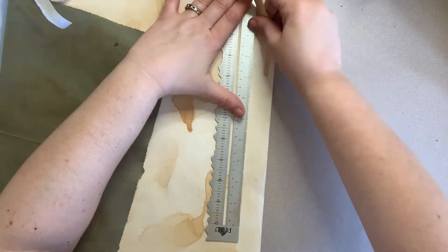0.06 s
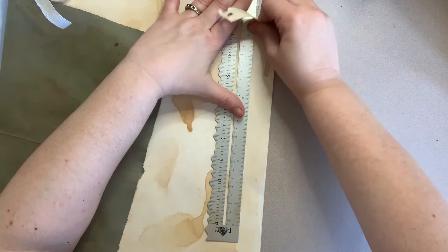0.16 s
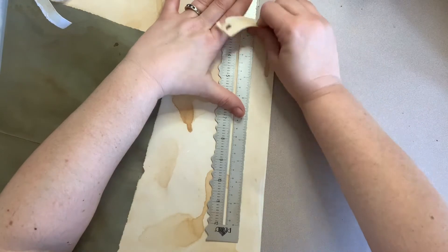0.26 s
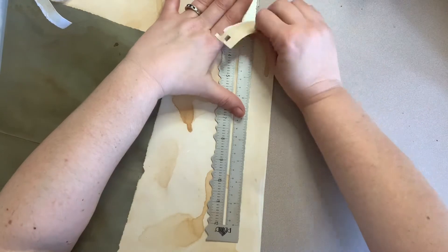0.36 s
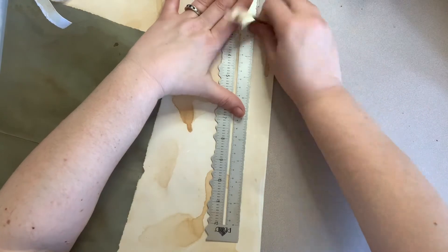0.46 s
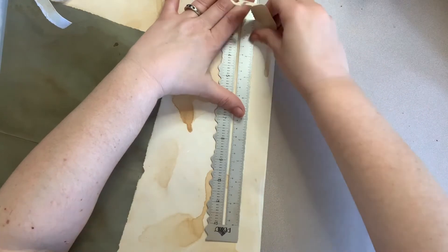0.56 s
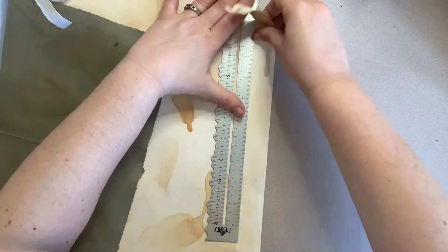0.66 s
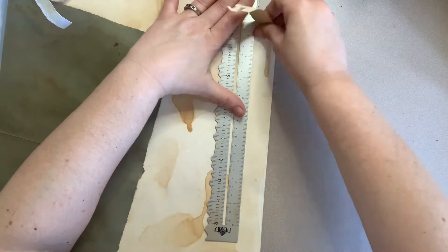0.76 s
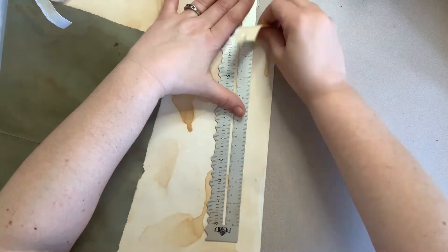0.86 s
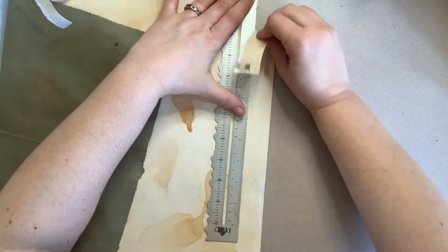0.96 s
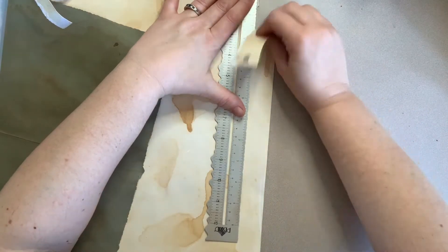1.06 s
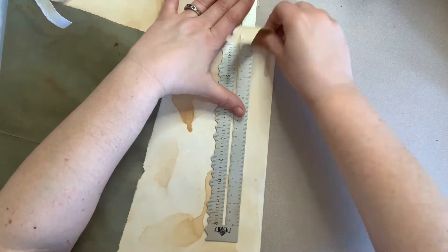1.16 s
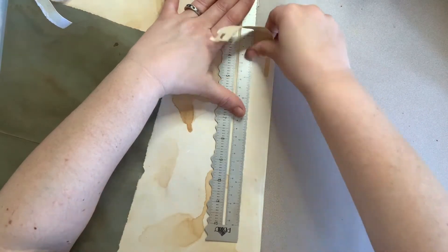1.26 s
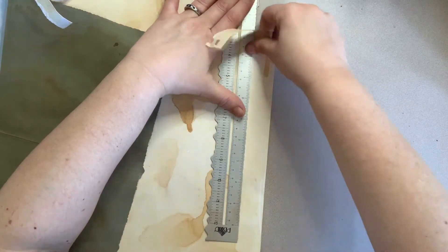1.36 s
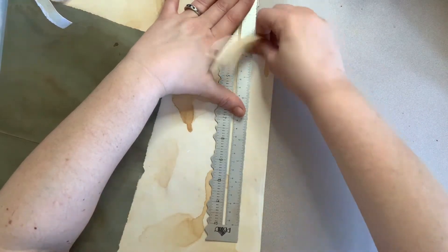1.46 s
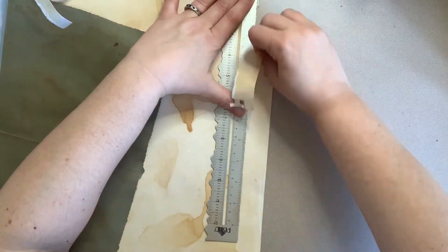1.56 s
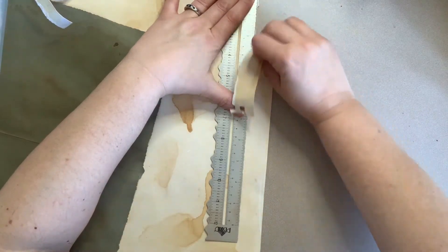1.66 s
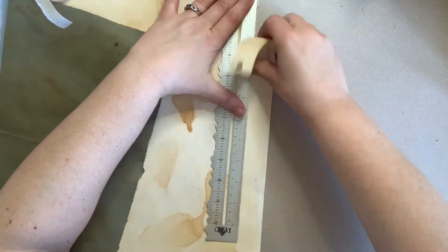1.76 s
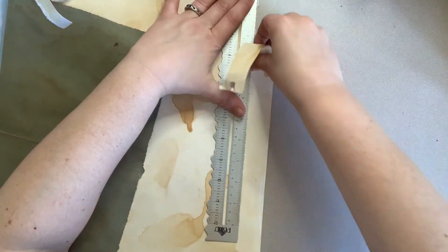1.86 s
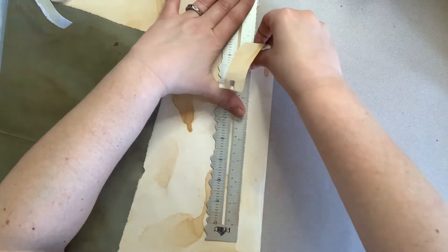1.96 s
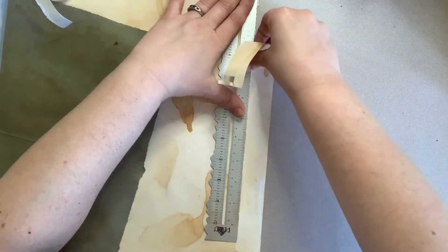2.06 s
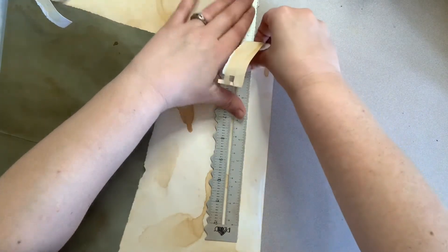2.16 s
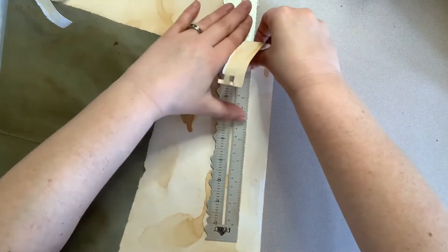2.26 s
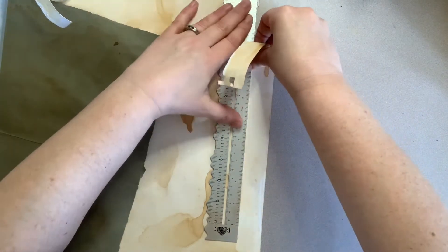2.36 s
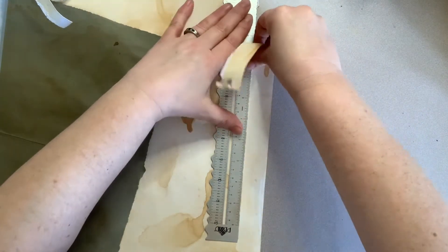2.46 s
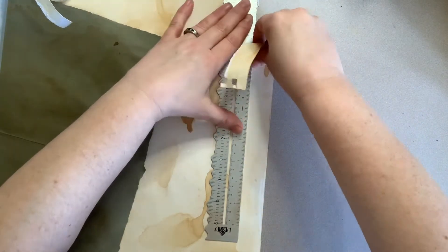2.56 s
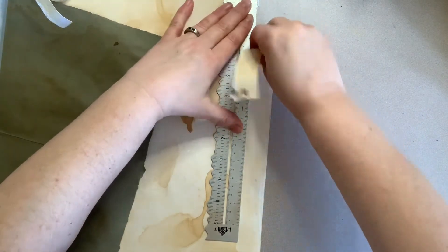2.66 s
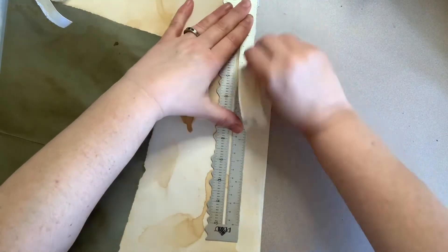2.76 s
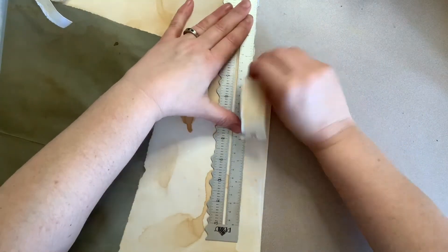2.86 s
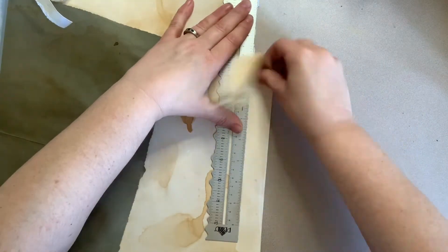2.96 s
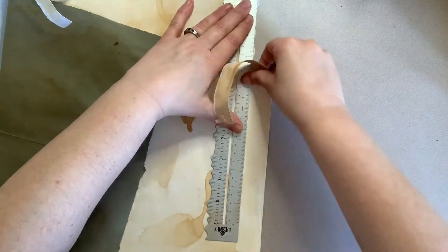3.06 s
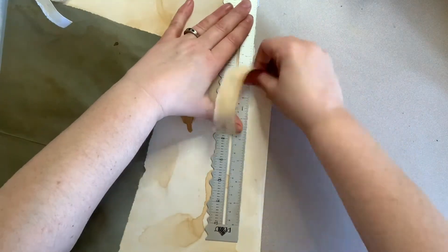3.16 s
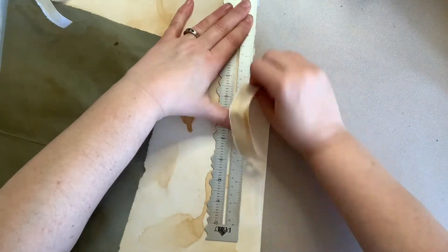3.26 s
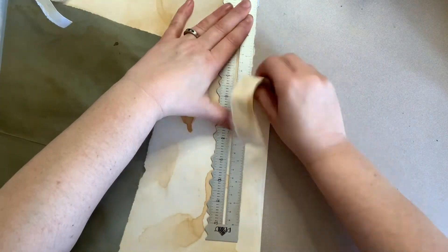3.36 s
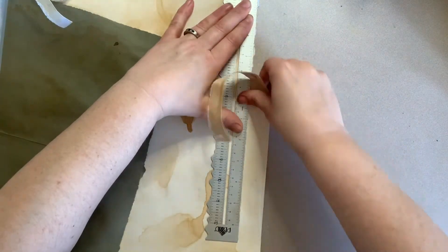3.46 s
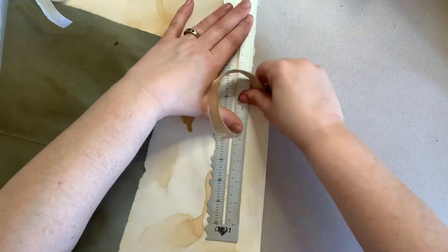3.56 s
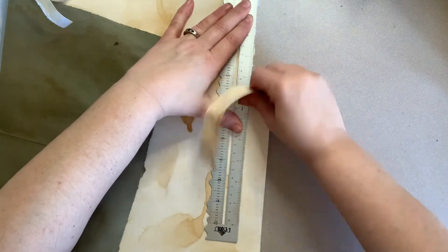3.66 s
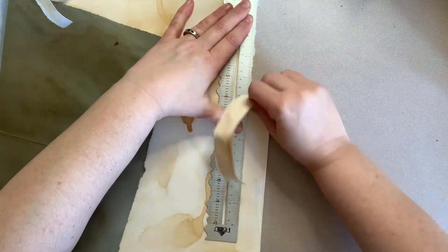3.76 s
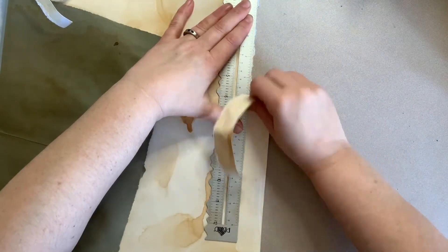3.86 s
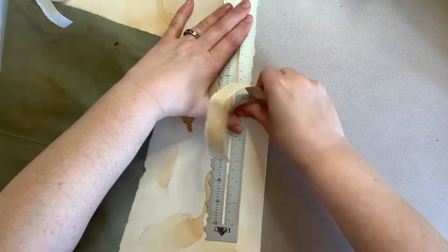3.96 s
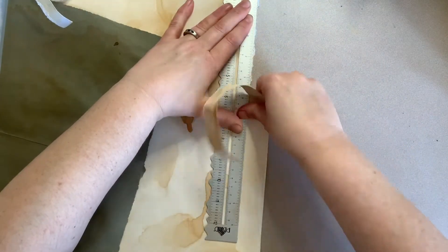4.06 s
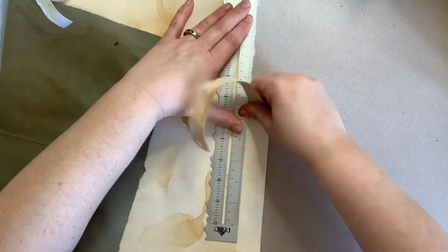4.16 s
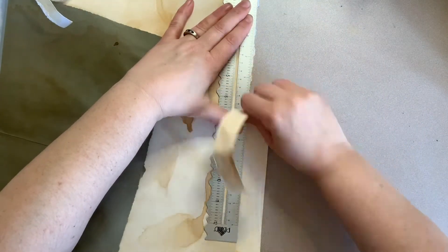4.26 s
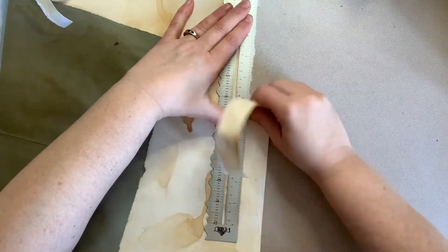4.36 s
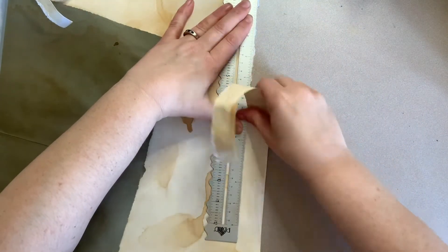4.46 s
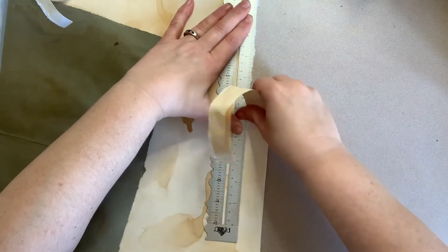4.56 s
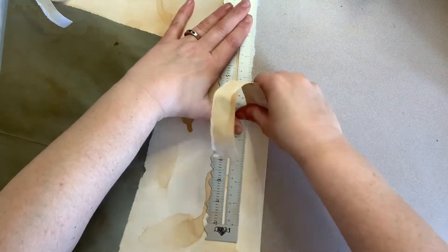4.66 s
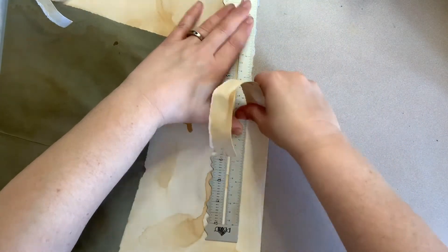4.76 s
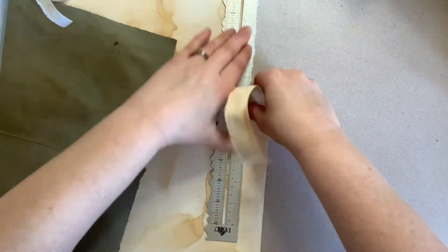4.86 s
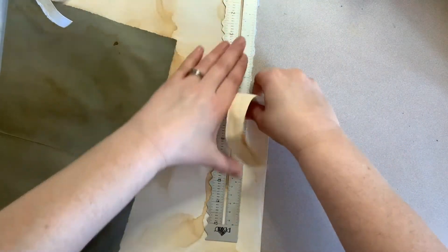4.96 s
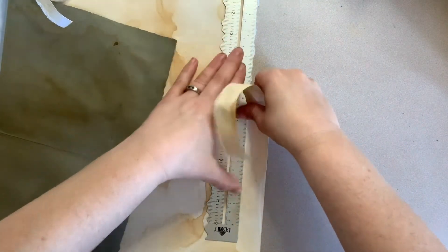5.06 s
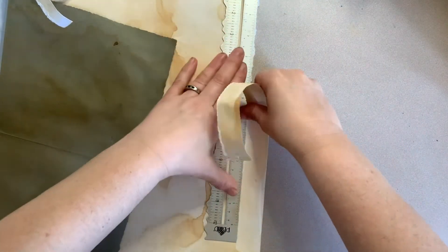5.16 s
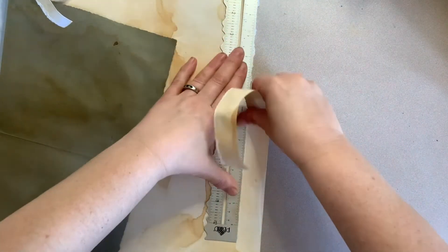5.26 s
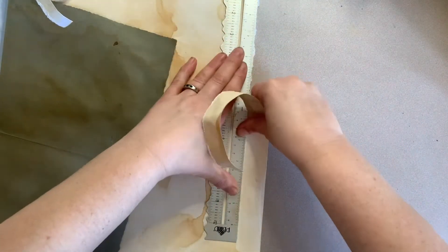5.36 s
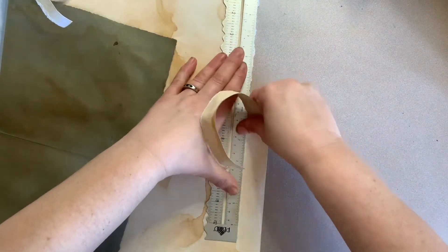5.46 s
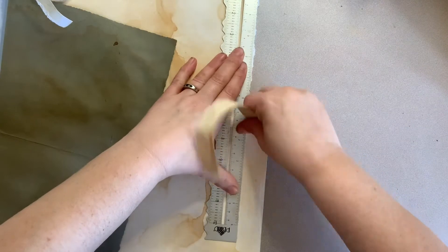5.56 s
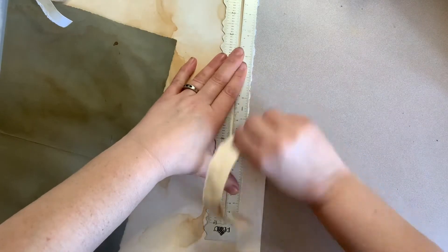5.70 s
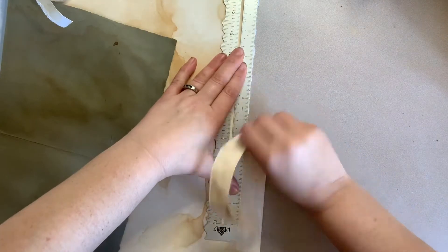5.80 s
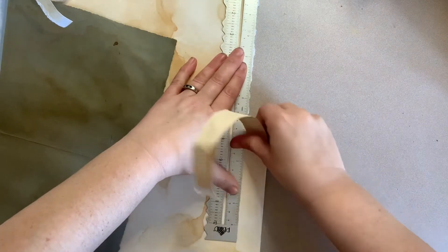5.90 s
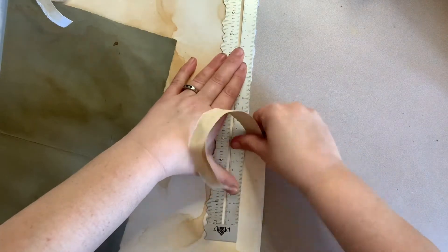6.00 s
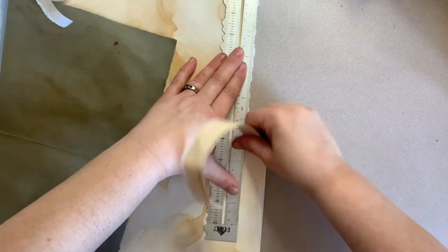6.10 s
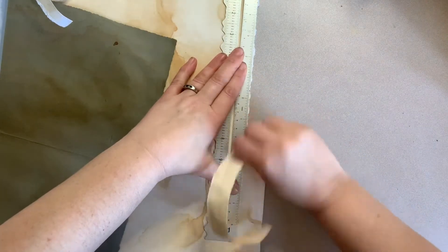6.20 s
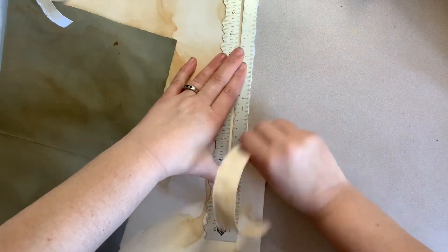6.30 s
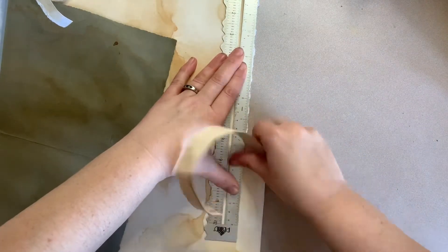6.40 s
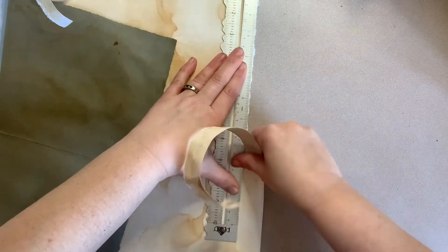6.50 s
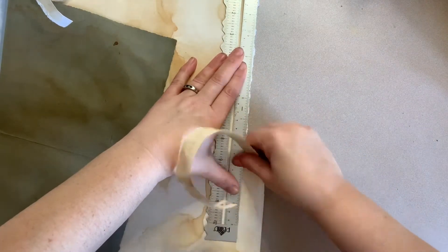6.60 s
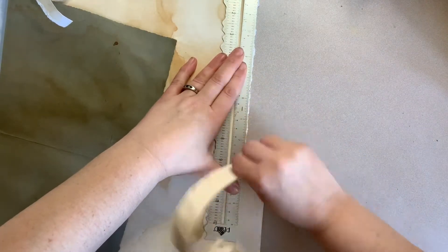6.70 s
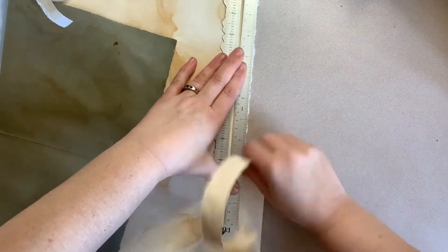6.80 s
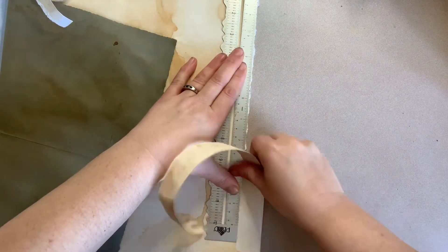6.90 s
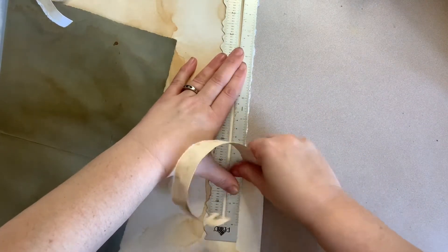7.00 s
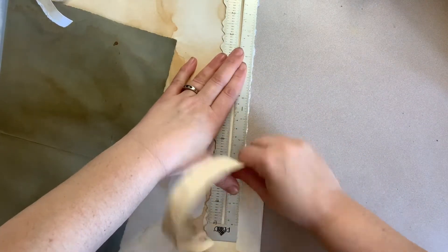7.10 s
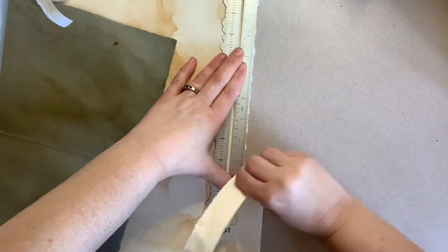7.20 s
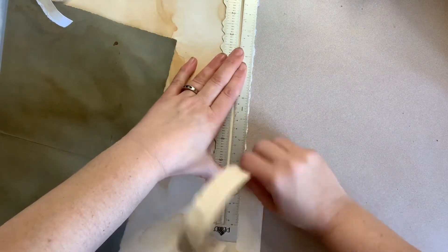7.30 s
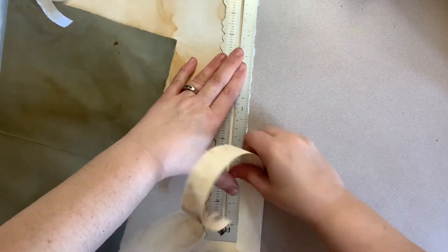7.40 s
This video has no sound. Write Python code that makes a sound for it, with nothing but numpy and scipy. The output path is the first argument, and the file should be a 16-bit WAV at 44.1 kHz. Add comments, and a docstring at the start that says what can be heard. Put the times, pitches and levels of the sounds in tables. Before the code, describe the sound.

Heavy paper is torn along a metal ruler in short crackling rips, with sharp snaps and light table knocks, in a quiet room.

```python
"""A quiet room lies under heavy paper torn in short pulls along a steel ruler on a wooden table.
Two sharp snaps open it: where the edge lets go of a ruler tooth, fibres crack, the sheet flaps and the ruler rings.
Short rips follow as clumped crackle, with a strong snap at 1.5 s; the sheet scrapes, the table thuds and thrums.
A faint squeak at 3.06 s comes before the loudest snaps, near 3.6 s; rips and weaker snaps then run to the end.
Filtered noise makes crackle and scrape, dying sines make ruler and table; two microphone ports hear it all."""
import sys
import numpy as np
from scipy import signal
from scipy.fft import rfft, irfft
from scipy.io import wavfile
from scipy.ndimage import uniform_filter1d

SR = 44100
rng = np.random.default_rng(int(sys.argv[2]) if len(sys.argv) > 2 else 0)


def persist_wave(psi):
    """Save psi, clipped to +-1, as 16-bit WAV."""
    counts = np.round(np.clip(psi, -1, 1) * 32767).astype(np.int16)
    wavfile.write(sys.argv[1], SR, np.atleast_2d(counts).T)


N = 328104

# The steady quiet of the room. Each row: frequency in Hz, relative spectrum level in dB.
HUSH_SPECTRUM = [(25, -10), (60, 0), (130, -6.5), (400, -20.5), (700, -26.5), (4000, -22), (16000, -29.5)]
HUSH_DB = -74.5  # RMS level
# Decay of the room. Each row: frequency in Hz, time to fall by 60 dB in s.
ROOM_DECAY = [(200, 0.057), (700, 0.19), (1800, 0.12), (5000, 0.17), (12000, 0.035)]
# Modes of the table top. Each row: frequency in Hz, nominal level in dB, time to fall by 60 dB in s.
TABLE_MODES = [(102, 4.5, 0.097), (134, -1.5, 0.18), (196, -0.5, 0.11), (255, 0.5, 0.05), (307, 1.5, 0.06),
               (356.4, 2.5, 0.073), (426, -2.5, 0.096), (593.4, -7, 0.02), (800, -6, .04)]
# Blows on the table. Each row: start in s, peak level in dB, softness (time to greatest force) in ms.
THUDS = [(0.07, -34, 0.87), (0.124, -35.5, 0.86), (0.462, -52, 0.94), (0.781, -54.5, 1.2), (1.081, -57, .4),
         (1.368, -47, 0.35), (1.459, -35.5, 1.8), (1.721, -52.5, 1.2), (2.429, -62, 0.65),
         (2.613, -48, 0.89), (2.778, -51, 1.05), (2.81, -51.5, 0.34), (2.882, -48, 2.8), (2.921, -40, 0.4),
         (2.949, -64, 0.8), (3.268, -52, 0.52), (3.34, -53, 1), (3.361, -52, 1.1), (3.586, -44, 1.2),
         (3.606, -31.5, 0.1), (3.65, -31.5, 0.085), (3.723, -31.5, 0.39), (3.88, -41, 0.35),
         (4.14, -36, 0.089), (4.242, -43, 0.13), (4.301, -50.5, 0.1), (4.757, -56, 0.33),
         (4.963, -49, 0.078), (5.555, -50, 1.6), (5.663, -42, 0.25), (5.832, -43.5, 0.15),
         (5.851, -46, 0.19), (6.093, -35, 0.09), (6.134, -35.5, 0.27), (6.296, -46.5, 0.82),
         (6.611, -34.5, 0.13), (6.663, -44, 1.2), (6.815, -46.5, 0.21), (7.107, -49.5, 0.63),
         (7.207, -51, 0.2)]
# Modes of the steel ruler. Each row: frequency in Hz, nominal level in dB, time to fall by 60 dB in s.
RULER_MODES = [(624, -13, 0.05), (870, 1, 0.05), (1180, -14, 0.026), (1410, 3, 0.024), (1740, -1, 0.035),
               (1985, 2, 0.025), (2205, 6, 0.035), (2480, 5, 0.035), (2775, 3, 0.03), (3500, -2, 0.03),
               (4300, -8, .03), (5300, -12, .03)]
# The sheet dragging under the ruler. Each row: time in s, level in dB, favoured pitch in Hz.
DRAG = [(0.0, -57, 987), (0.07, -67.5, 1030), (0.45, -73.5, 1667), (0.55, -85, 1740), (1.12, -68.5, 1700),
        (1.34, -79, 1583), (3.045, -84, 2400), (3.055, -52.5, 2400), (3.12, -56.5, 2300), (3.2, -47, 1900),
        (3.5, -66, 1622), (3.65, -46, 1773), (4.05, -71, 1500), (4.35, -104.5, 1500), (4.94, -70.5, 1130),
        (5.0, -55.5, 1086), (5.06, -65, 1650), (5.3, -65.5, 1650), (5.7, -59, 1600), (5.96, -65, 1600),
        (6.2, -72.5, 1567), (6.5, -82, 1676), (7.1, -96, 1500), (7.2, -59.5, 1098), (7.27, -67, 995),
        (7.44, -103, 1034)]
# One squeak of the sheet: start in s, length in s, pitch in Hz, level in dB.
SQUEAK = (3.058, .042, 1176, -53)
# Snaps of the edge. Each row: start in s, peak level of flap and ruler in dB, flap pitch in Hz,
# fibre crack re that peak in dB, decay time in ms.
SNAPS = [(0.073, -12, 1220, -3.5, 2.16), (0.128, -13, 2800, -2, 0.84), (0.308, -45, 3000, -2, 1.8),
         (0.413, -37.5, 1840, -14, 2.1), (0.46, -43, 2240, -22, 14), (0.574, -51.5, 2034, -5.5, 5.4),
         (0.689, -57.5, 2810, 12, 1.9), (0.784, -40.5, 1730, 2.5, 6.1), (1.082, -40, 1740, -2, 2.4),
         (1.109, -41.5, 1790, -16, 2), (1.309, -44, 2470, 4.5, 4.2), (1.366, -30.5, 1820, -2.5, 3),
         (1.458, -14, 2070, -11, 2), (1.665, -41, 1810, -21, 5.6), (1.683, -37, 1890, -7, 8.2),
         (1.721, -47, 3800, -9, 1.2), (1.88, -46, 1940, -14, 0.66), (1.945, -63, 3500, 5.5, 1.),
         (1.973, -63, 3000, -2, 1.5), (2.043, -67.5, 3020, 6.5, 1.5), (2.081, -55, 2364, -6, 2.9),
         (2.088, -49, 2430, 2, 2.7), (2.237, -57.5, 2040, -5.5, 1.9), (2.426, -45.5, 2000, -14, 4.2),
         (2.618, -41, 3200, 8.5, 8.1), (2.895, -31.5, 2700, -28, 4.9), (2.907, -33.5, 3040, -16, 0.25),
         (2.92, -33.5, 3350, 1, 2.2), (2.945, -48, 3220, -27, 2.8), (3.048, -51, 2520, -12, 1.8),
         (3.057, -40, 1090, -30, 1.6), (3.123, -30.5, 1470, -32, 1.56), (3.137, -26, 2300, -8.5, 4.2),
         (3.341, -41.5, 1580, 3.5, 7), (3.359, -46, 3120, -25, 1.9), (3.584, -22, 1800, -4.5, 1.6),
         (3.609, -4.5, 2050, -8.5, 1.7), (3.648, -8.5, 1570, -11, 2.76), (3.725, -17.5, 1420, -8.5, 2.6),
         (4.137, -22, 1580, -4.5, 2.9), (4.168, -34, 1660, 2, 6.6), (4.242, -37.5, 1670, -14, 6.6),
         (4.299, -36, 1470, -8, 1.3), (4.518, -54, 3510, 13.5, 8.8), (4.757, -36, 1743, -6, 4.4),
         (4.962, -44, 2070, 0.5, 2.4), (5.043, -37.5, 1800, -2, 3.2), (5.488, -36, 2060, -1, 5.7),
         (5.558, -36, 1660, 0, 3.6), (5.581, -39.5, 4000, 2.5, 1.4), (5.632, -35.5, 1340, -10, 11),
         (5.668, -37, 1800, -2, 3.9), (5.722, -38.5, 2150, -7, 1.9), (5.828, -35, 3100, -26, 2.9),
         (5.838, -41, 3000, -3, 2.3), (5.898, -41, 3270, -36, 1.2), (6.095, -22.5, 1740, -4, 3),
         (6.132, -20.5, 1440, -7.5, 1.4), (6.156, -27, 2300, -11, 2.7), (6.299, -37, 2500, -72, 7.6),
         (6.539, -39.5, 2000, 8.5, 4.8), (6.611, -23, 1820, -4, 3.9), (6.643, -19, 1550, -9.5, 2),
         (6.73, -27.5, 2160, -6, 5.2), (6.791, -39, 2330, -3, 3.3), (7.042, -38, 1700, -5.5, 13),
         (7.108, -36.5, 1990, -5, 10), (7.141, -35, 3150, 0, 5.4), (7.31, -36.5, 3460, -12, 5.2)]
# Colour of breaking fibres. Each row: frequency in Hz, relative spectrum level in dB.
FIBRE_SPECTRUM = [(150, -27), (600, -27), (950, -12.5), (1400, 2), (2400, -9.5), (3500, 1.5), (5000, 2.5),
                  (7000, 0), (10000, 2), (13000, -3.5), (15500, -3), (16200, -31)]
# Separate rips of the strip. Each row: start in s, swell in ms, hold in ms, level in dB,
# treble re the rest in dB.
RIPS = [(0.0, 3, 58, -54.5, -3), (0.21, 31, 72, -57.5, 1), (0.398, 16, 42, -53, -5),
        (0.559, 5.6, 6.3, -60.5, -19), (0.683, 4.2, 7.4, -72, 12), (0.778, 14, 215, -51.5, 2.5),
        (1.063, 11, 120, -61.5, -33), (1.131, 14, 122, -55.5, 7), (1.302, 6.4, 12, -51, 1),
        (1.358, 4.6, 26, -64, 7), (1.444, 20, 2, -42, 0), (1.496, 4.1, 120, -53, 3.5),
        (1.66, 16, 72, -56.5, -16), (1.84, 18, 12, -65, -17), (1.964, 6.1, 9.6, -64, -25),
        (2.075, 5.4, 6.9, -66, -2.5), (2.223, 15, 30, -69, -12), (2.37, 11.3, 31, -64.5, -4.5),
        (2.42, 9.1, 234, -58.5, 5.5), (2.606, 21, 56, -52.5, -1), (2.721, 55, 35.5, -42, -3),
        (2.87, 28, 105, -44, -3), (3.1, 27, 9.2, -80, 10), (3.133, 8.9, 144, -46, 0),
        (3.326, 17, 9, -39, -22), (3.398, 49, 56, -52.5, 3.5), (3.74, 12, 22, -59, 10.5),
        (3.838, 8.4, 79, -52.5, -1), (3.99, 26, 10.5, -47, 0), (4.097, 40, 7.1, -48, -9),
        (4.15, 5.9, 112, -50.5, 3), (4.33, 20, 150, -62, -7.5), (4.448, 11.5, 22, -54, 3),
        (4.499, 8.1, 13, -64, -6), (4.735, 18, 11.5, -51.5, -10.5), (4.827, 7.2, 100, -57, -6),
        (4.97, 52, 10, -50, 1), (5.115, 5.4, 3.5, -60, -0.5), (5.237, 19, 69, -59, -4),
        (5.33, 25, 74, -51, 1), (5.468, 20, 13, -48, 0.5), (5.555, 11, 87, -60, 8.5),
        (5.63, 50, 55, -45.5, 2), (5.787, 11, 44, -45, -5.5), (5.898, 29, 9.9, -50.5, 2.5),
        (5.999, 13, 120, -57, 0.5), (6.14, 20, 54, -49, 3.5), (6.286, 19, 9, -44, -6.5),
        (6.375, 29, 73, -58.5, 8), (6.489, 44, 11, -53, -0.5), (6.58, 33, 6, -50, -3),
        (6.62, 34, 81, -48.5, 0), (6.74, 16, 54, -48, -3.5), (6.883, 16, 93, -58, 0.5),
        (7.032, 9.3, 21, -51.5, 3), (7.103, 9.6, 86, -49, -4), (7.293, 21.6, 18.4, -51, -3.5)]
# Likeness of the two ports. Each row: frequency in Hz, likeness from 0 to 1.
PORT_LIKENESS = [(100, .9), (700, .6), (1300, .85), (3000, .6), (6000, .75), (8400, .995), (10400, .88),
                 (12400, .995), (14400, .8), (15800, .92)]
# Phase between the ports. Each row: frequency in Hz, lead of the left in radians.
PORT_LEAD = [(340, 0), (1380, .7), (2070, 2.1), (3790, 2), (5860, 4.4), (6890, 4.1), (8000, 3.2),
             (8900, 3.05), (11800, .15), (13000, -.1), (15200, -2.6)]
# Balance of the ports. Each row: frequency in Hz, left over right in dB.
PORT_BALANCE = [(60, 2.5), (250, -1.5), (550, 0.2), (1200, 2.1), (2400, 1), (4500, 3.3), (8500, 0),
                (14000, 0)]

BAND_EDGE_HZ = 16500
SWELL_DB, SAG_DB_PER_S, RELEASE_DB_PER_S = 12, 28.5, 427.5  # each rip swells, sags, then lets go
STIR_DB = -85  # the sheet never lies quite still
FLUTTER_DB, FLUTTER_DB_PER_S, FLUTTER_TREBLE_DB = -33.5, 169, -22.5  # the freed edge after a snap
HAND_THRUM_DB = -15  # the dragging hand thrums the table, re the drag
SHAKE_DB, SHAKE_DB_PER_S = -19, 200  # the table trembles on after a thud


def gain_of(db):
    """Definition of level: 20 dB is a factor of ten in amplitude."""
    return 10 ** (np.asarray(db) / 20)


def evened(x):
    """Normalisation of power: the RMS value becomes one."""
    return x / np.sqrt(np.mean(x ** 2) + 1e-20)


def read(points, hz):
    """Interpolation of a curve on a logarithmic frequency scale."""
    f, value = np.transpose(points)
    return np.interp(np.log(hz + 1), np.log(f + 1), value)


def along(rows, column):
    """Linear interpolation of one column over time, in the first column."""
    return np.interp(np.arange(N) / SR, np.transpose(rows)[0], np.transpose(rows)[column])


def add(mix, s, sound):
    """Superposition: a sound starting at s seconds adds to the mix."""
    part = mix[..., round(s * SR):][..., :sound.shape[-1]]
    part += sound[..., :part.shape[-1]]


def coloured(x, points):
    """Linear filtering: each frequency is scaled by a spectrum in dB."""
    hz = np.fft.rfftfreq(x.shape[-1], 1 / SR)
    return irfft(rfft(x) * gain_of(read(points, hz)), x.shape[-1])


def treble(x, hz):
    """High-pass filtering: second-order loss below the given frequency."""
    return signal.sosfilt(signal.butter(2, hz, "high", fs=SR, output="sos"), x)


def bent(x, lag_100_s):
    """Dispersion of bending waves: low ones come late, by lag_100_s at 100 Hz."""
    hz = np.fft.rfftfreq(x.shape[-1], 1 / SR)
    return irfft(rfft(x) * np.exp(-40j * np.pi * lag_100_s * np.sqrt(hz)), x.shape[-1])


def ring(modes, seconds):
    """Modal superposition: one blow sounds as a sum of dying sines."""
    t = np.arange(round(seconds * SR)) / SR
    return sum(gain_of(db - 60 * t / t60) * np.sin(2 * np.pi * hz * t) for hz, db, t60 in modes)


def patchy(x, patchy_db):
    """Spectral modulation: the colour drifts in patches as the curl of the strip changes."""
    z = signal.stft(x, nperseg=256, noverlap=192)[2]
    across_bands = uniform_filter1d(rng.standard_normal(z.shape[1:]), 3, 0)
    patches = evened(uniform_filter1d(across_bands, 16, 1))
    drifting = signal.istft(z * gain_of(patchy_db * patches), nperseg=256, noverlap=192)[1]
    return evened(drifting[:, :N])


def envelope(s, swell_ms, hold_ms, db, release_db_per_s):
    """Exponential growth and decay: the gain of one stroke swells, sags while held, and releases."""
    t = np.arange(N) / SR - s
    swell, hold = max(swell_ms, 1) / 1000, max(hold_ms, 0) / 1000
    held = np.clip(t - swell, 0, hold)
    shape = -SWELL_DB * np.clip(1 - t / swell, 0, 1) - SAG_DB_PER_S * held
    return (t >= 0) * gain_of(db + shape - release_db_per_s * np.maximum(t - swell - hold, 0))


def hush():
    """Stationary noise: the steady quiet of the room has a fixed spectrum."""
    return gain_of(HUSH_DB) * evened(coloured(rng.standard_normal((2, N)), HUSH_SPECTRUM))


def room(x):
    """Reverberation: sparse taps of random sign, each band dying at its own speed."""
    taps = np.zeros((2, SR // 3))
    at = np.arange(120, SR // 3 - 20, 20)
    at = at + rng.integers(0, 20, (2, len(at)))
    np.put_along_axis(taps, at, rng.choice([-1., 1.], at.shape), 1)
    hz, t, z = signal.stft(taps, SR, nperseg=256)
    decay = gain_of(-60 * t / read(ROOM_DECAY, hz)[:, None])
    tail = signal.istft(z * decay, SR, nperseg=256)[1]
    return signal.fftconvolve(x, tail / np.linalg.norm(tail[0]), axes=1)[:, :N]


def table_top(modes, lag_100_s=0.0096):
    """Modal ringing with dispersion; little radiates under the first modes."""
    rung = np.pad(ring(modes, .3), (0, 8000))
    return bent(treble(treble(rung, 77), 77), lag_100_s)


def table(tear_gain, tug_db=-22, place_db=4):
    """Forced response: thuds, the hands and the tug of the tear ring the same table modes."""
    out, t = np.zeros((2, N)), np.arange(900) / SR
    places = rng.standard_normal((len(THUDS), 2, len(TABLE_MODES)))
    for (s, db, soft_ms), paths in zip(THUDS, places):
        # each thud lands somewhere else, so it favours other modes
        tops = []
        for place in paths:
            modes = [(f, d + place_db * p, t60) for (f, d, t60), p in zip(TABLE_MODES, place)]
            tops.append(table_top(modes))
        blow = t * np.exp(-1000 * t / np.clip(soft_ms, .1, 3))
        thud = signal.fftconvolve(blow[None], np.array(tops), axes=1)
        add(out, s, gain_of(db) * thud / abs(thud).max())
    unevenness = evened(uniform_filter1d(rng.standard_normal(N), 900))
    lumps = gain_of(6.8 * unevenness) * rng.standard_normal((2, N))
    thrum = evened(signal.fftconvolve(lumps, table_top(TABLE_MODES)[None], axes=1)[:, :N])
    shake = sum(envelope(s, 5.7, 0, db + SHAKE_DB, SHAKE_DB_PER_S) for s, db, _ in THUDS)
    hand = gain_of(along(DRAG, 1) + HAND_THRUM_DB)
    tug = gain_of(tug_db) * tear_gain
    return out + (shake + hand + tug) * thrum


def scraping(clump_db=1.5, near_db=12, above_db=45, top_hz=2950):
    """Friction noise: the sheet drags under the ruler, dull, in the modes near its pitch."""
    clumps = evened(uniform_filter1d(rng.standard_normal(N), 500))
    drag = gain_of(clump_db * clumps) * rng.standard_normal((2, N))
    x, power = np.zeros((2, N)), 0
    for hz, _, t60 in RULER_MODES[:9]:
        octaves = np.log2(hz / along(DRAG, 2))
        # modes well above the favoured pitch fall away faster
        share = gain_of(-near_db * abs(octaves) - above_db * np.maximum(octaves - .15, 0))
        mode = ring([(hz, 0, .7 * t60)], .04)  # the ring is damped under the sheet
        x += share * evened(signal.oaconvolve(drag, mode[None], axes=1)[:, :N])
        power = power + share ** 2
    dull = signal.sosfilt(signal.butter(6, top_hz, fs=SR, output="sos"), x / np.sqrt(power))
    return gain_of(along(DRAG, 1)) * patchy(dull, patchy_db=2.5)


def squeak():
    """Resonant filtering of noise: the sheet chatters briefly on one narrow tone."""
    s, seconds, hz, db = SQUEAK
    count = round(seconds * SR)
    tone = signal.lfilter(*signal.iirpeak(hz, 22, SR), rng.standard_normal(count))
    out = np.zeros(N)
    add(out, s, gain_of(db) * evened(tone) * signal.windows.tukey(count, .3))
    return out


def snaps(rise_s=0.00023, rattle_s=0.0015, rattle_db=-13, ruler_db=6, near_db=9, place_db=1.0,
          lag_100_s=.003, knock_db=-2):
    """Sudden release: a bright crack of fibres, a dull flap of the sheet, the ruler briefly rattled."""
    air, t = np.zeros((2, N)), np.arange(4000) / SR
    rise = 1 - np.exp(-t / rise_s)
    fade_out = np.minimum(rise[::-1], 1) ** 2
    draws = rng.standard_normal((len(SNAPS), 3, 2, len(t)))
    places = rng.standard_normal((len(SNAPS), len(RULER_MODES)))
    for (s, db, hz, crack_db, ms), noises, place in zip(SNAPS, draws, places):
        crack_noise, flap_noise, ruler_noise = noises
        fall = rise * np.exp(-1000 * t / np.clip(ms, .4, 12))

        crack = treble(coloured(crack_noise * fall, FIBRE_SPECTRUM), 1.3 * hz)
        crack = gain_of(crack_db) * crack / abs(treble(crack, 9900)).max()  # level set by its top treble

        flap = signal.lfilter(*signal.iirpeak(hz, 2.4, SR), flap_noise * fall)
        flap = treble(treble(flap, .55 * hz), .55 * hz)

        # the flap drives the modes nearest its pitch; the place along the ruler favours others
        modes = [(f, d - near_db * abs(np.log2(f / hz)) + place_db * p, t60)
                 for (f, d, t60), p in zip(RULER_MODES, place)]
        shake = ruler_noise * (fall + gain_of(rattle_db) * rise * np.exp(-t / rattle_s))
        knock = gain_of(knock_db - 2 * ms) * (np.arange(len(t)) == 30)  # short snaps hit at once
        shake = shake / np.linalg.norm(shake[0]) + knock
        rung = signal.fftconvolve(shake, ring(modes, 0.078)[None], axes=1)[:, :len(t)]
        rung = treble(rung, 0.36 * hz)

        body = flap / abs(flap).max() + gain_of(ruler_db) * rung / abs(rung).max()
        body = bent(body, lag_100_s)
        body = body / abs(body).max()
        add(air, s, gain_of(db) * (crack + body) * fade_out)
    return air


def pull():
    """Amplitude modulation: gains of the tear below and above its treble edge, over time."""
    rips = np.array([envelope(s, swell, hold, db, RELEASE_DB_PER_S) for s, swell, hold, db, _ in RIPS])
    flutter = sum(envelope(s, 1.3, 0, db + FLUTTER_DB, FLUTTER_DB_PER_S) for s, db, *_ in SNAPS)
    low = rips.sum(0) + flutter + gain_of(STIR_DB)
    high = gain_of(np.transpose(RIPS)[4]) @ rips
    high = high + gain_of(FLUTTER_TREBLE_DB) * flutter + gain_of(STIR_DB - 8.5)
    return low, high


def random_breaks(per_s, spread_db, most):
    """Random point process: breaks at a mean rate, of exponentially spread levels up to a limit."""
    return gain_of(spread_db * np.minimum(rng.exponential(1, N), most)) * (rng.random(N) < per_s / SR)


def pops(per_s=500, spread_db=3, cycles=5, count=14):
    """Damped oscillation: single tough fibres snap, each a short tick on one of a set of pitches."""
    size = random_breaks(per_s, spread_db, 4)
    which, t, out = rng.integers(0, count, N), np.arange(600) / SR, np.zeros((2, N))
    for k, hz in enumerate(np.geomspace(2000, 8000, count)):
        swing = np.sin(2 * np.pi * (hz * t + rng.random((2, 1))))
        tick = hz * t * np.exp(-3 * hz * t / cycles) * swing
        out += signal.oaconvolve((size * (which == k))[None], np.sqrt(hz) * tick, axes=1)[:, :N]
    return evened(out)


def tearing(low_gain, high_gain, per_s=1800, spread_db=1.0, clump_db=2.5, hiss=1.0):
    """Shot noise: fibres break in clumps over a fine hiss, a little different along two paths."""
    clumps = evened(uniform_filter1d(uniform_filter1d(rng.standard_normal(N), 300), 200))
    size = random_breaks(per_s, spread_db, 6)
    bursts = signal.lfilter([1], [1, -.93], size)  # each decays in a third of a millisecond
    x = (evened(bursts) + hiss) * gain_of(clump_db * clumps) * rng.standard_normal((2, N))
    x = patchy(coloured(x, FIBRE_SPECTRUM), patchy_db=3.5)
    x = x + .5 * pops()
    high = treble(x, 4400)
    return low_gain * (x - high) + high_gain * high


def scene():
    """Superposition of the sources along two paths, with the paper also reverberated by the room."""
    low, high = pull()
    paper = tearing(low, high) + snaps() + scraping() + squeak()
    paper = treble(paper, 200)  # thin paper moves no deep bass
    return paper + gain_of(-9.0) * room(paper) + table(low) + hush()


def record(dry):
    """Partial coherence: the right port mixes a phase-shifted left path with the second; both band-limited."""
    hz = np.fft.rfftfreq(N, 1 / SR)
    a, b = rfft(dry)
    same = np.clip(read(PORT_LIKENESS, hz), 0, 1)
    balance = gain_of(read(PORT_BALANCE, hz) / 2)  # half the difference goes to each port
    right = (same * a + np.sqrt(1 - same ** 2) * b) * np.exp(-1j * read(PORT_LEAD, hz))
    ports = irfft(np.array([a * balance, right / balance]), N)
    band_limit = signal.firwin(511, BAND_EDGE_HZ, window=("kaiser", 9), fs=SR)
    return signal.oaconvolve(ports, band_limit[None], "same")


dry = scene()
out = record(dry)
persist_wave(out)
```